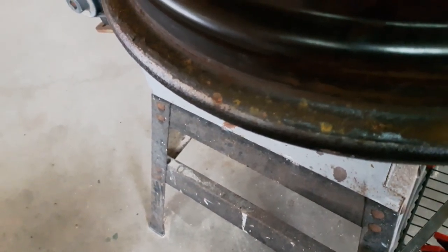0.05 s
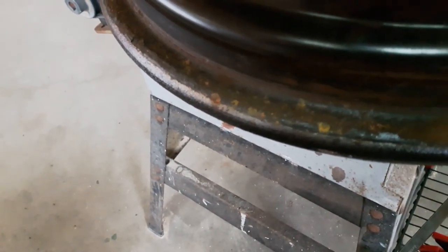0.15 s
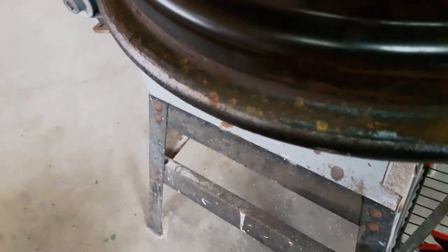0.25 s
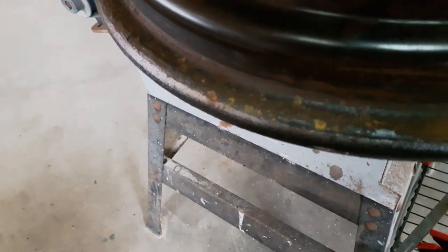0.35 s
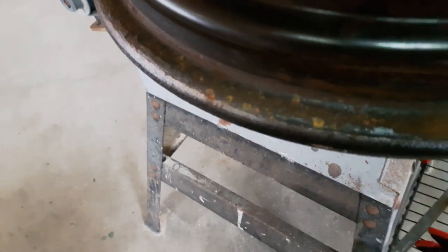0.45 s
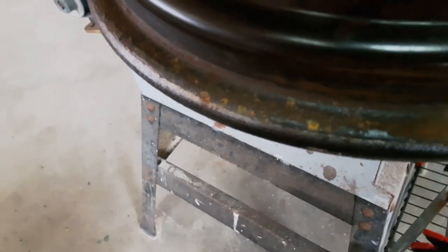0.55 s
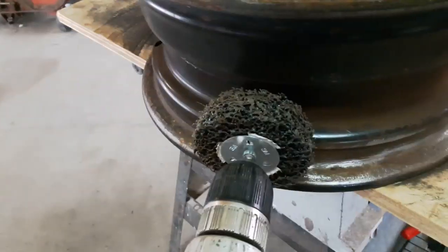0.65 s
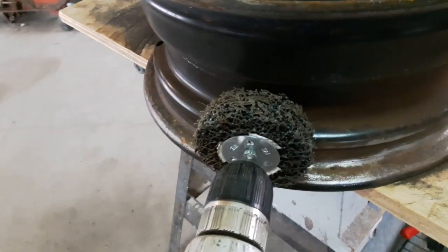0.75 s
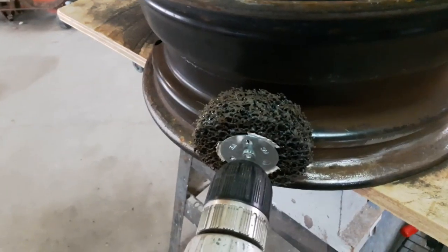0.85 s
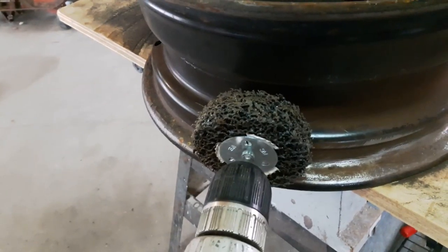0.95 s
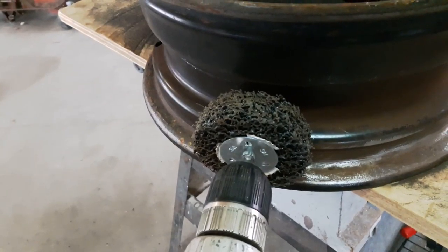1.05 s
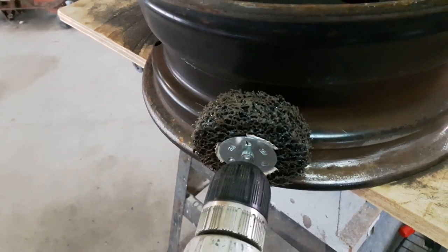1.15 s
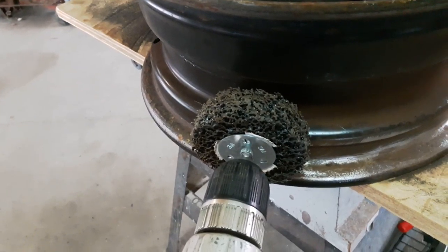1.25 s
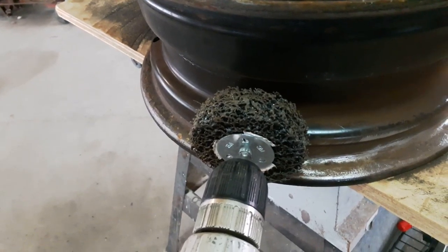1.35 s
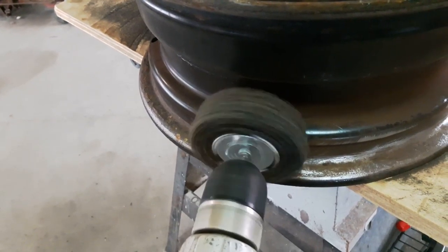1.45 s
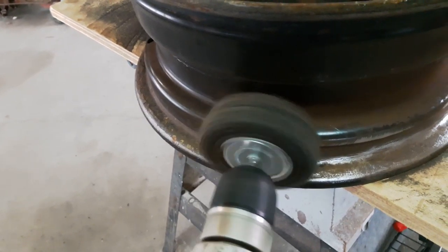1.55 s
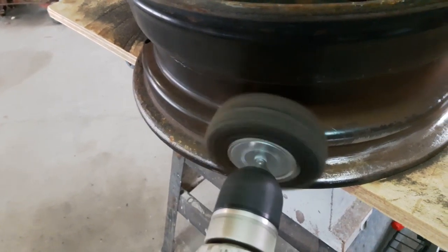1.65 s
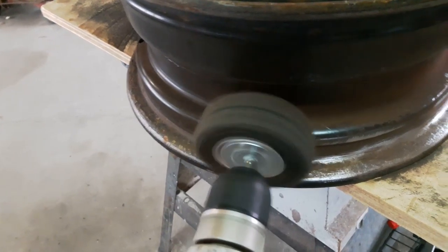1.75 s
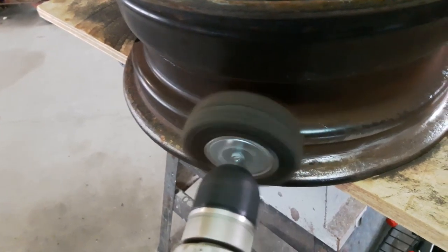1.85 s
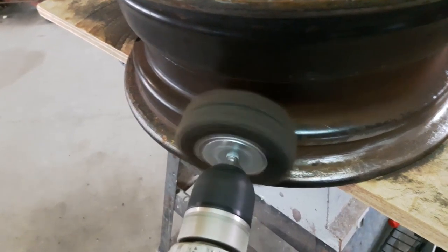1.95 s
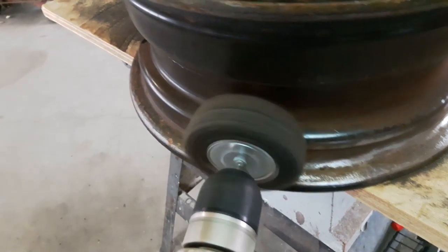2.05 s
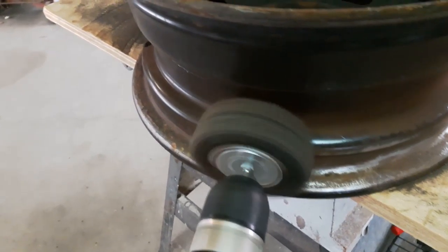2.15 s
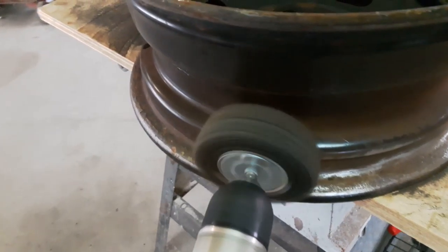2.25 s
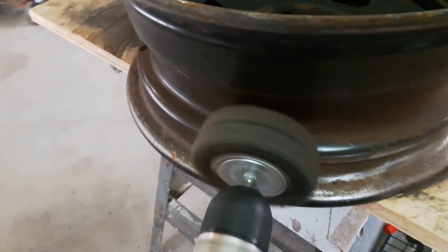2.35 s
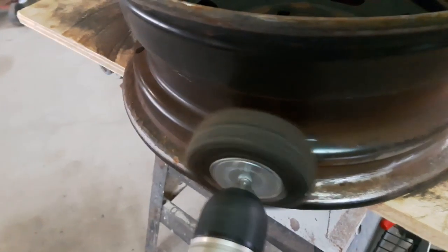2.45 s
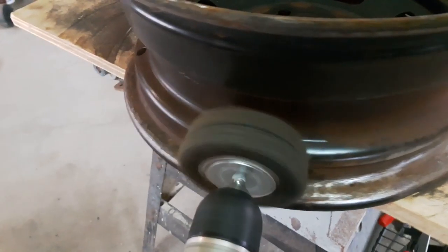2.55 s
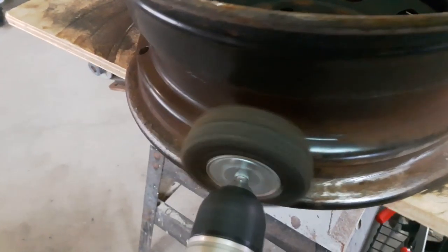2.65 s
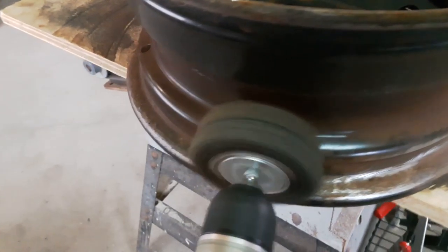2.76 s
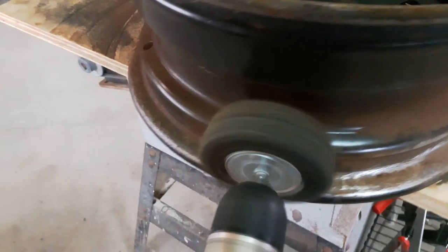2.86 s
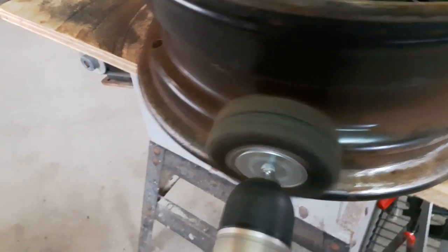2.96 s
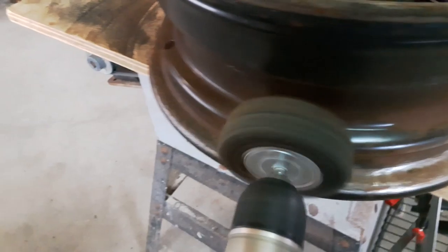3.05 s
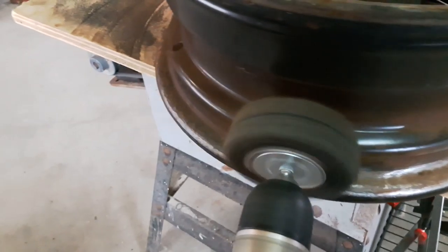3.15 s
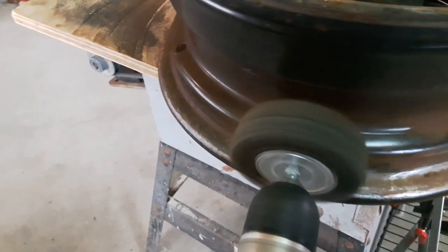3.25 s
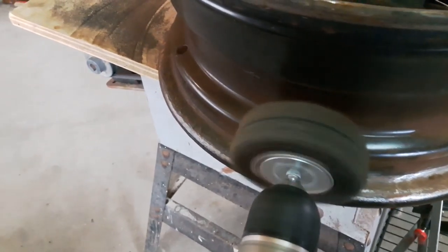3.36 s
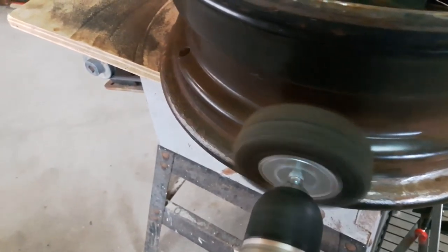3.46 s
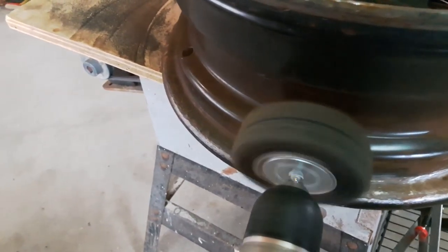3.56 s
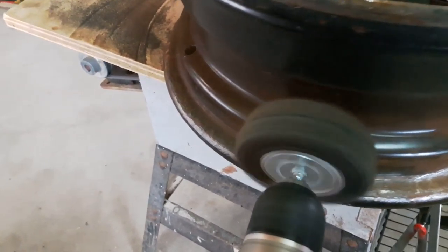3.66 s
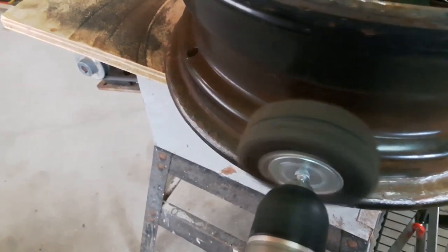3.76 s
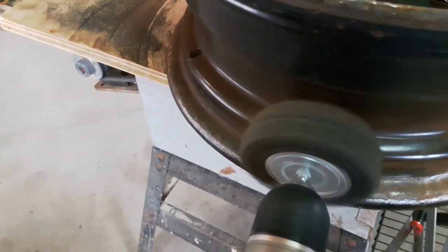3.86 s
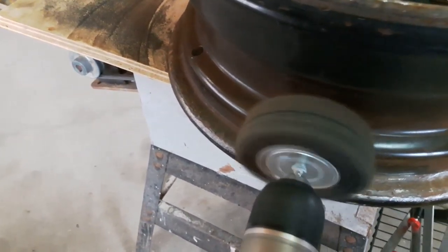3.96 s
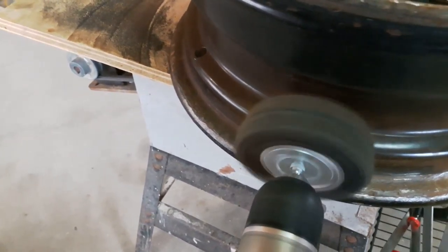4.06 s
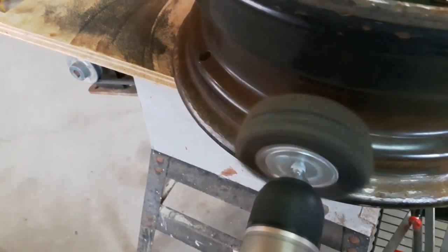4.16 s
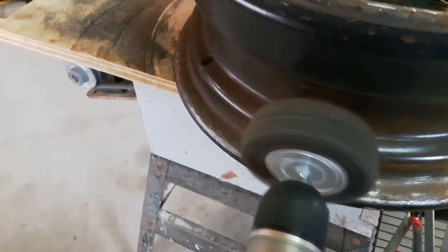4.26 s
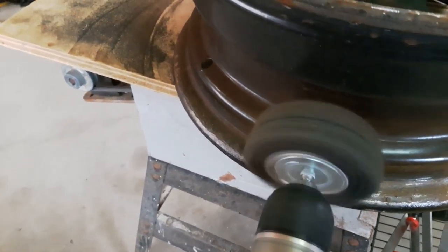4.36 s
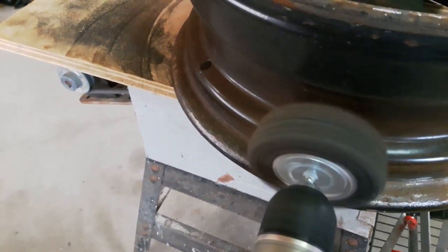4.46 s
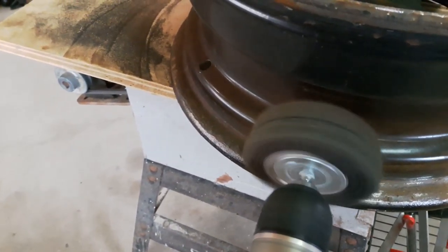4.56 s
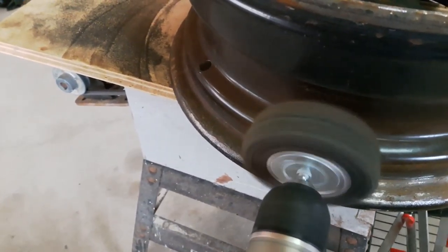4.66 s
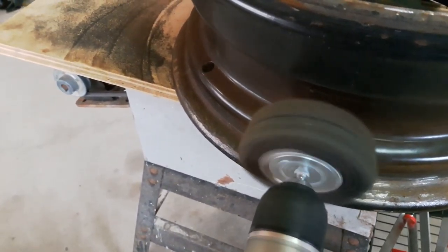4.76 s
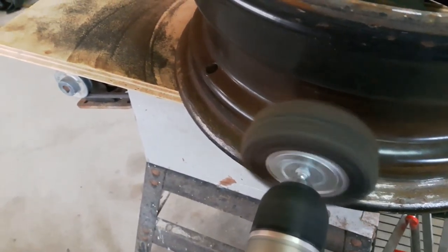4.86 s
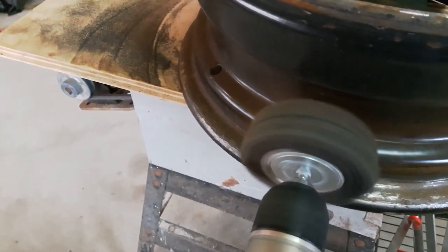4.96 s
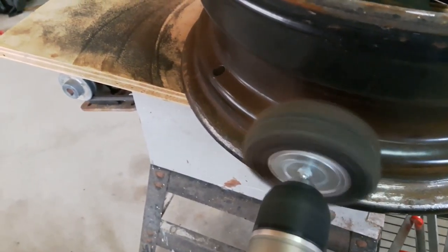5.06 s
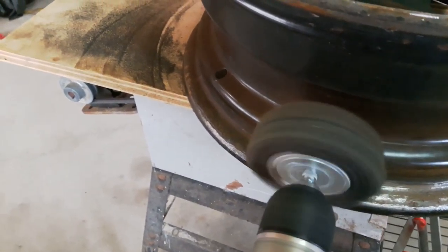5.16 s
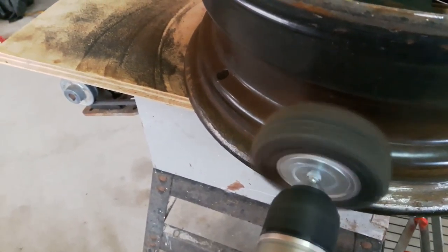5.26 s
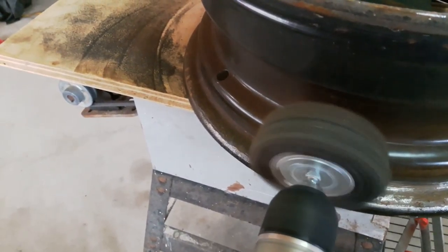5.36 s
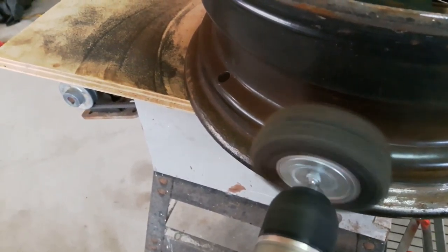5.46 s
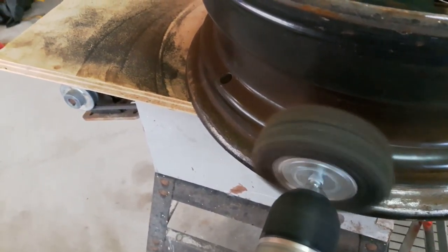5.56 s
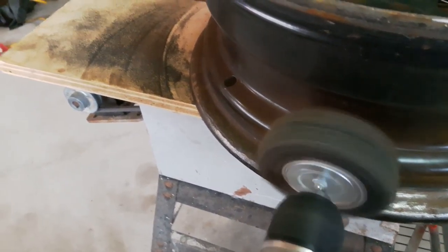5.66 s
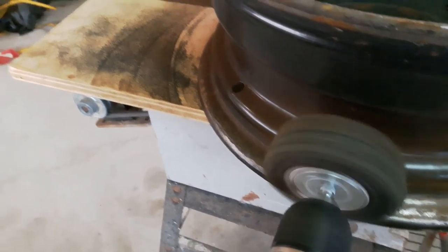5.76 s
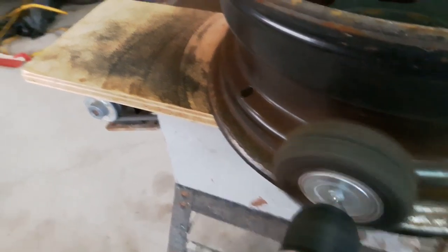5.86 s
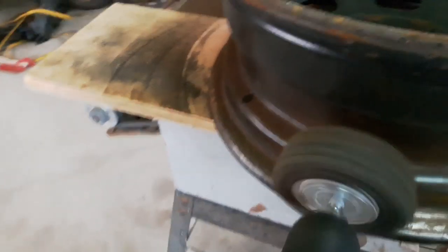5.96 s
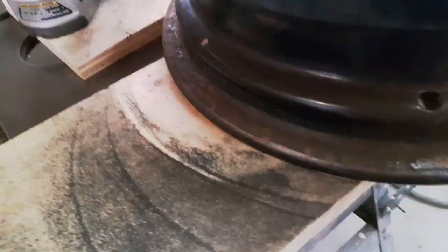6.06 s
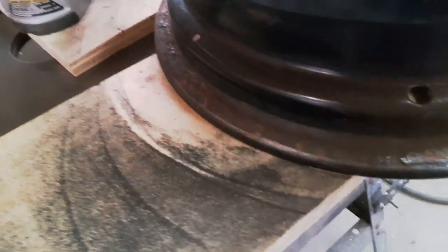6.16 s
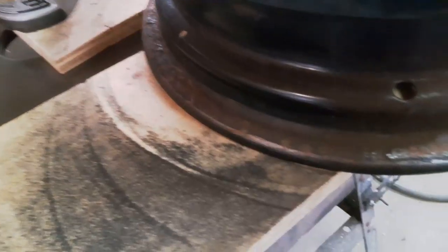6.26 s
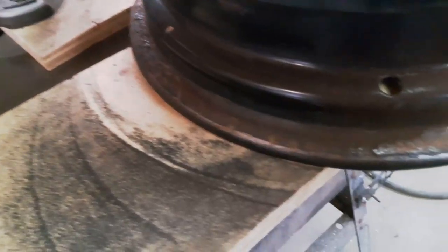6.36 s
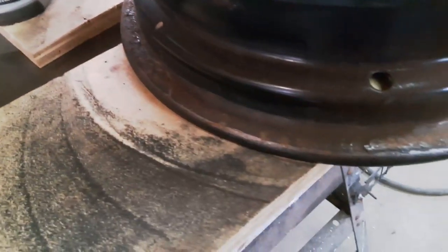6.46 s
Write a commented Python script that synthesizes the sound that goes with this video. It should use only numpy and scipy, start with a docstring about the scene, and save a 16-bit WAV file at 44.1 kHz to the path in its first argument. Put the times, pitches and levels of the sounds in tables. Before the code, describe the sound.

Quiet workshop hum and small knocks, then a cordless drill spins up, its abrasive wheel scrubbing a steel rim harshly until an abrupt cut to quiet.

```python
"""Brush wheel on a rusty rim, quiet workshop

Mains hum, a faint regular tick, air and low rumble lie under everything. Fingers knock the camera body
(struck resonances) and tick the trigger (noise bursts), then a cordless drill spins up and presses an abrasive
brush wheel on a steel rim. Motor and gears whine as tones locked to rotation, the out-of-round wheel throbs
once a turn, and grit noise scrubs and rings the rim. A hard cut leads from the running drill to the quiet room."""
import sys
import numpy as np
from scipy import signal
from scipy.fft import rfft, irfft, next_fast_len
from scipy.io import wavfile
from scipy.ndimage import uniform_filter1d, map_coordinates

SR = 44100
rng = np.random.default_rng(int(sys.argv[2]) if len(sys.argv) > 2 else 0)


def store_wav(level_fs):
    """Save 16-bit WAV to argv[1]."""
    pcm = np.round(np.clip(np.atleast_2d(level_fs), -1, 1) * 32767)
    wavfile.write(sys.argv[1], SR, pcm.T.astype(np.int16))


N = 287135
TIME = np.arange(N) / SR  # s
START_S, FULL_S, CUT_S = 1.5248, 1.76, 6.1003  # first kick, trigger fully in, hard cut to the quiet room
GEARING = 135 / 8  # motor turns for one turn of the wheel
RATED_HZ = 252  # motor turns a second at which the layer levels are stated


def amp(db):
    """dB to gain."""
    return 10 ** (np.asarray(db) / 20)


def unit(x):
    """Scaled to rms 1."""
    return x / np.sqrt(np.mean(x ** 2) + 1e-20)


def curves(rows):
    """One value per sample for each column after the time."""
    s, *cols = np.transpose(rows)
    return [np.interp(TIME, s, c) for c in cols]


def since(start_s):
    """Seconds passed since a moment, zero before it."""
    return np.maximum(TIME - start_s, 0)


def random_phase():
    """A random starting angle in radians."""
    return rng.uniform(0, 2 * np.pi)


def wobble(rate):
    """A smooth random curve, rate knots a second."""
    coarse = TIME[::48]
    knots = rng.standard_normal(int(N * rate / SR) + 4)
    return np.interp(TIME, coarse, map_coordinates(knots, [coarse * rate]))


def filtered(x, response):
    """x times a complex response of frequency."""
    m = next_fast_len(N + SR // 2)
    return irfft(rfft(x, m) * response(np.fft.rfftfreq(m, 1 / SR)), m)[..., :N]


def coloured(x, points):
    """x shaped by (frequency [Hz], gain [dB]) points on a log axis, rms 1."""
    f, db = np.transpose(points)
    return unit(filtered(x, lambda hz: amp(np.interp(np.log(hz + 1), np.log(f + 1), db))))


def mode(hz, width):
    """The causal response of one resonance."""
    return lambda f: 1j * f * width / (hz * hz - f * f + 1j * f * width)


def patchy(patchy_db):
    """White noise with patches of random gain in time and frequency."""
    z = signal.stft(rng.standard_normal(N), nperseg=512)[2]
    across_frequency = uniform_filter1d(rng.standard_normal(z.shape), size=6, axis=0)
    field = uniform_filter1d(across_frequency, size=8, axis=1)
    return signal.istft(z * amp(patchy_db * unit(field)), nperseg=512)[1][:N]


def grains(rate, spread_db):
    """Random clicks, rate a second on average, a few much larger than the rest."""
    hits = rng.random(N) < rate / SR
    return unit(hits * rng.standard_normal(N) * amp(spread_db * rng.exponential(size=N)))


# spectra of the room's low rumble and of its air: (frequency [Hz], relative level [dB])
RUMBLE_SPECTRUM = [(25, -37.5), (45, -22), (62, -4.5), (105, -2.5), (130, -7), (215, -4.5), (330, -12.5),
                   (600, -17), (900, -28.5), (1500, -62.5)]
AIR_SPECTRUM = [(350, -33), (600, -3), (1190, -4), (1400, -8.5), (2200, -14.5), (3300, -18.5), (4200, -16),
                (4700, -23.5), (5400, -29), (9000, -29.5), (16000, -31.5)]
# mains hum partials: (frequency [Hz], relative level [dB])
HUM_PARTIALS = [(60, -72), (120, -81), (240, -78), (300, -60.5), (360, -70), (420, -72), (480, -75)]
# course of the whole hum: (time [s], gain [dB])
HUM_COURSE = [(0, -5), (.5, -6), (.56, -0.5), (6.1, 1), (6.11, -2), (6.51, -1)]
# low tones that swell and fade: (start [s], end [s], frequency [Hz], peak level [dB])
DISTANT_TONES = [(6.2, 6.27, 200, -51), (6.24, 6.33, 285, -55), (6.31, 6.35, 215, -55),
                 (6.37, 6.42, 225, -51), (6.36, 6.5, 280, -52)]
RUMBLE_DB, AIR_DB, AFTER_DB = -58, -69.5, 1.5  # base levels; rise of rumble and air after the cut


def workshop():
    """Room tone: shaped noise for rumble and air, mains partials, and brief low tones from far away."""
    after_db = AFTER_DB * (TIME > CUT_S)
    rumble_db = RUMBLE_DB + after_db + 0.8 * wobble(2.5) + 0.5 * wobble(13)
    rumble = amp(rumble_db) * coloured(patchy(patchy_db=1.3), RUMBLE_SPECTRUM)
    air_db = AIR_DB + after_db + 0.83 * wobble(2.5)
    air_noise = patchy(patchy_db=1.6) + 0.3 * grains(300, spread_db=2)
    air = amp(air_db) * coloured(air_noise, AIR_SPECTRUM)
    hum = np.zeros(N)
    for hz, db in HUM_PARTIALS:
        hum += amp(db + 1.5 + 1.2 * wobble(12)) * np.sin(2 * np.pi * hz * TIME + random_phase())
    tones = np.zeros(N)
    for start, end, hz, db in DISTANT_TONES:
        swell = np.sin(np.pi * np.clip((TIME - start) / (end - start), 0, 1))
        tones += amp(db) * swell * np.sin(2 * np.pi * hz * TIME)
    return rumble + air + amp(curves(HUM_COURSE)[0]) * hum + tones


# three stretches joined by hard cuts, each with its own tick timing: (stretch start [s], reference tick [s])
TICK_STRETCHES = [(0, .0905), (.52, .5714), (6.1, 6.127)]
PULSE_DB, TICK_EVERY_S = -58, 0.1024  # noise level before filtering; interval


def pulse():
    """A faint tick about ten times a second: decaying noise, narrow in pitch, with a trace of treble."""
    starts, references = np.transpose(TICK_STRETCHES)
    stretch = np.searchsorted(starts, TIME, side="right") - 1
    since_tick = (TIME - references[stretch]) % TICK_EVERY_S
    decay_db = 60 * since_tick / 0.016
    burst = amp(PULSE_DB + 1.5 * wobble(10) - decay_db) * rng.standard_normal(N)
    return filtered(burst, lambda f: 0.06 * (f > 5000) + mode(4400, 900)(f) ** 2)


# finger blows on the camera body: (time [s], level [dB], sharp part [dB])
BLOWS = [(0.52, -27, 3.5), (.535, -44, -2), (.5452, -38, -20), (0.5474, -24, -15)]
# resonances of the camera body: (frequency [Hz], width [Hz], level [dB])
BODY_MODES = [(126, 49, 6.5), (510, 190, 5.5), (1000, 340, -1), (2080, 870, -3), (4140, 250, -2)]


def knocks():
    """Fingers knock the camera body: a sharp edge and a soft, rounded push ring its resonances."""
    blows, t = np.zeros(N), np.arange(SR // 100) / SR
    for s, db, sharp_db in BLOWS:
        push = t / 0.0006 * np.exp(1 - t / 0.00042)
        edge = amp(sharp_db) * np.exp(-t / 0.0003)
        blows[round(s * SR):][:len(t)] -= amp(db) * (0.34 * push + edge)
    ringing = np.zeros(N)
    for k, (hz, width, db) in enumerate(BODY_MODES):
        ringing += (-1) ** k * amp(db) * filtered(blows, mode(hz, width))  # neighbours in opposite sign
    return ringing


# trigger ticks: (time [s], burst level before the housing [dB])
TRIGGER_TICKS = [(.84, -69), (1.3613, -50.5), (1.3654, -56), (1.4294, -70), (1.5255, -50), (1.5434, -42)]


def housing(f):
    """The plastic housing: some direct sound and three broad resonances."""
    low, middle, high = mode(900, 900)(f), mode(4200, 650)(f), mode(14500, 4000)(f)
    return 0.1 + 3 * middle ** 2 + 6 * low ** 2 + 0.25 * high ** 2


def trigger():
    """Small plastic ticks as the finger loads the switch: noise bursts ringing briefly in the housing."""
    bursts, t = np.zeros(N), np.arange(SR // 50) / SR
    for s, db in TRIGGER_TICKS:
        bursts[round(s * SR):][:len(t)] += amp(db - 60 * t / 0.016) * rng.standard_normal(len(t))
    return filtered(bursts, housing)


# motor speed at full trigger: (time [s], turns a second [Hz])
FULL_SPEED = [(1.95, 258.1), (2.2, 255.3), (2.95, 251.4), (4.0, 251.8), (4.4, 253.0), (4.95, 251.0),
              (6.1, 251.9)]
HALF_HZ, KICK_HZ, SPIN_UP_S = 190.6, 40.3, 0.07  # trigger half in: speed approached, first kick, time constant
JUMP_S = 0.034  # time to reach full speed once the trigger is fully in
HIGH_SPOT_S = 1.95  # a moment when the high spot of the wheel meets the rim


def rotation():
    """Smooth speed [Hz], speed with the load tugging at it [Hz], and motor angle [rad]."""
    half = HALF_HZ - (HALF_HZ - KICK_HZ) * np.exp(-since(START_S) / SPIN_UP_S)
    steady = half + (curves(FULL_SPEED)[0] - half) * np.clip((TIME - FULL_S) / JUMP_S, 0, 1)
    speed = steady * (1 + 0.00199 * wobble(25))
    motor = 2 * np.pi * np.cumsum(speed) / SR
    return steady, speed, motor - np.interp(HIGH_SPOT_S, TIME, motor)


# (level at rated speed and full pressure [dB], power of speed,
#  loss at light pressure [dB], bounce once a turn at light pressure [dB])
SCRUBBING, RASPING = (-25.5, 1.54, 4.5, 0.9), (-27.5, 2, 6.5, 1.5)
HISSING, HUMMING = (-19.5, 2.5, 1.5, 0), (-33.5, 3, -1, 0.3)


def layer_db(layer, steady, light, wheel):
    """Base level of a layer [dB]: grows with speed, and follows pressure and the wheel's bounce."""
    db, power, light_db, bounce_db = layer
    speed_db = 20 * np.log10(steady / RATED_HZ)
    return db + power * speed_db + light * (bounce_db * np.cos(wheel) - light_db)


LOOSE = 0.95  # extra share of phase wander at light pressure


def lines(motor, light, table, flutter_db, rate):
    """Tones at multiples of the motor angle, unsteady in level and phase, pulsing once a wheel turn."""
    high_spot = np.cos(motor / GEARING)
    tones = np.zeros(N)
    for k, db, wander, depth, light_db in table:
        gain = (1 + depth * high_spot) * amp(db - light_db * light + flutter_db * wobble(rate))
        tones += gain * np.sin(k * motor + wander * (1 + LOOSE * light) * wobble(60))
    return tones


# motor shaft tones, the 8/3 row the gear mesh tone: (multiple of motor turns, relative level [dB], phase wander
# [rad], depth of pulsing once a wheel turn, loss at light pressure [dB])
SHAFT_LINES = [(1, -0.37, 0.05, -0.017, -1.5), (2, -6, 0.43, 0, 0.5), (64 / 27, -11, .2, 0, 3),
               (8 / 3, -5.5, 0.19, 0, 3), (5, -4, 0.6, 0.1, 1.5)]
# shaking that repeats each wheel turn: (multiple of wheel turns, relative level [dB])
WHEEL_SHAKE = [(1, -44.5), (2, -46.5), (3, -29), (4, -36), (5, -28.5), (6, -22.5), (7, -14.5), (8, -17.5),
               (9, -20.5), (10, -15.5), (11, -16.5), (12, -10), (13, -17.5), (14, -16.5), (15, -14.5),
               (16, -12.5), (17, -18.5), (18, -4), (19, -14.5), (20, -9.5), (21, -15.5), (22, -23.5),
               (23, -16.5)]
# the motor hum dips briefly: (time [s], depth [dB])
HUM_DIPS = [(2.31, 4), (3.0, 2.5), (5.7, 6)]
DIP_S, SHAKE_LIGHT_DB = 0.058, 3.5  # dip time to 1/e; shake lost at light pressure


def motor_hum(drill_db, speed, motor, light):
    """Shaft tones with the gear mesh tone, and a wheel imbalance whose shaking grows with speed squared."""
    wheel = motor / GEARING
    for s, db in HUM_DIPS:
        drill_db = drill_db - db * np.exp(-((TIME - s) / DIP_S) ** 2)
    shake = np.zeros(N)
    for k, db in WHEEL_SHAKE:
        gain = amp(db - SHAKE_LIGHT_DB * light + 1.1 * wobble(3.01))
        shake += gain * np.sin(k * wheel + random_phase())
    shaft = lines(motor, light, SHAFT_LINES, flutter_db=1.4, rate=8)
    return amp(drill_db) * (shaft + 0.91 * (speed / RATED_HZ) ** 2 * shake)


# gear mesh tones: (multiple of motor turns, relative level [dB], phase wander [rad],
#  depth of pulsing once a wheel turn, loss at light pressure [dB])
GEAR_LINES = [(14 / 3, -10, 0.59, .3, -5.5), (7, -16.5, 0, 0.5, -1), (7.5, -4.5, 1.1, 1.05, 8),
              (9, -11, .5, 0.44, 5), (28 / 3, -3, 0.58, .08, 0), (56 / 3, -12, .9, .1, 0)]
# course of the gear whine: (time [s], gain [dB])
WHINE_COURSE = [(1.525, -44.5), (1.6, -34), (1.71, -42), (1.745, -33), (1.79, -40), (2.1, -38),
                (2.65, -30.5), (6.1, -30.5)]


def gear_whine(motor, light):
    """Gear mesh tones locked to the motor's rotation."""
    return amp(curves(WHINE_COURSE)[0]) * lines(motor, light, GEAR_LINES, flutter_db=1.3, rate=30)


# uneven brush pressure: (times a wheel turn, depth [0-1])
PRESSURE_THROB = [(1, 0.06), (2, 0.07), (5, 0.1), (9, 0.15)]


def brush_throb(wheel):
    """Brush pressure rising and falling through each turn of the out-of-round wheel."""
    throb = np.ones(N)
    for k, depth in PRESSURE_THROB:
        angle = random_phase() if k > 1 else 0  # the once-a-turn part peaks at the high spot
        throb += depth * np.cos(k * wheel + angle)
    return throb


# spectrum of the scrubbing: (frequency [Hz], relative level [dB])
SCRUB_SPECTRUM = [(35, -55), (55, -29), (100, -14.5), (260, -8), (400, -5.5), (900, -5), (1250, -2),
                  (1600, -6.5), (2100, -7), (3150, -7.5), (3500, -10.5), (4500, -30)]


def scrub(scrub_db, chatter):
    """Broad scrubbing of the brush: patchy noise and grit clicks under the chattering pressure."""
    grit = patchy(patchy_db=0.58) + 0.3 * grains(2000, spread_db=1.5)
    return amp(scrub_db - 1.0) * coloured(chatter * grit, SCRUB_SPECTRUM)


# spectrum of the rasp: (frequency [Hz], relative level [dB])
RASP_SPECTRUM = [(3300, -43), (3620, -19.5), (3770, 1.5), (4050, -1.5), (4550, -2.5), (5050, -9),
                 (5450, -20.5), (6500, -38.5)]
JOLT_DB, JOLT_S = 6, 0.025  # flare as the trigger goes fully in; its time constant


def rasp(rasp_db, chatter):
    """A narrower, brighter band of grit noise that flares as the trigger goes fully in."""
    jolt_db = JOLT_DB * (TIME > FULL_S) * np.exp(-np.abs(TIME - FULL_S) / JOLT_S)
    grit = patchy(patchy_db=0.5) + 0.37 * grains(2000, spread_db=1.5)
    return amp(rasp_db + jolt_db) * coloured(chatter ** 0.78 * grit, RASP_SPECTRUM)


# spectrum of the fine grit: (frequency [Hz], relative level [dB])
GRIT_SPECTRUM = [(4500, -41.5), (5500, -16), (7340, -10), (8360, -10.5), (11000, -4), (13700, 1.5),
                 (15200, 1.5), (16000, -2.5)]


def grit_hiss(hiss_db, throb):
    """Fine grit: treble noise with dense clicks, following the throb softly."""
    grit = patchy(patchy_db=0.73) + 0.42 * grains(6000, spread_db=1.5)
    pressure = throb ** 0.52 * amp(0.37 * wobble(40))
    return amp(hiss_db + 1.33) * coloured(pressure * grit, GRIT_SPECTRUM)


# rim modes, the 4070 Hz row a resonance of the drill housing: (frequency [Hz], width [Hz], relative level [dB],
# time of best drive [s], reach [s])
RIM_MODES = [(1276, 150, -8, 2.8, 4), (2541, 120, -20.5, 6.7, 2.1), (4003, 65, -16, 3.4, 3),
             (4070, 260, -8, 1.55, .15), (10720, 80, -15, 3, 3), (11620, 180, -8, 3.1, 3.5),
             (12930, 30, -11, 4, 3), (13255, 15, -7, 6.6, 0.86), (13455, 20, -4, 2.3, 1.1),
             (13900, 25, -6.5, 4.2, .9), (14870, 50, -11, 5, 2)]


def rim_ring(scrub_db, hiss_db, chatter):
    """The brush creeps along the rim, so noise drives each rim mode best at its own moment; one housing
    resonance rings near 4 kHz early on."""
    drive = chatter * rng.standard_normal(N)
    ring = np.zeros(N)
    for hz, width, db, best, reach in RIM_MODES:
        follow_db = scrub_db if hz < 6000 else hiss_db - 6  # high modes follow the fine grit
        away_db = 3.6 * ((TIME - best) / reach) ** 2
        ring += amp(follow_db + db - away_db) * unit(filtered(drive, mode(hz, width)))
    return ring


LEAN_S = 0.48  # time constant of the pressure building up after full trigger
BITE_S = 0.02  # time constant of the bright layers building up after the first kick
TAIL_DB, TAIL_S = -25, 0.004  # faint remainder after the cut and its time constant


def drill():
    """Motor and gears turn the wheel while speed and pressure set how hard grit scrubs the rim."""
    steady, speed, motor = rotation()
    wheel = motor / GEARING
    light = np.exp(-since(FULL_S) / LEAN_S)  # 1 = barely touching, 0 = full pressure
    layers = (SCRUBBING, RASPING, HISSING, HUMMING)
    scrub_db, rasp_db, hiss_db, drill_db = [layer_db(layer, steady, light, wheel) for layer in layers]
    throb = brush_throb(wheel)
    chatter = throb * amp(0.42 * wobble(30) + 0.69 * wobble(120))
    machine = motor_hum(drill_db, speed, motor, light) + gear_whine(motor, light)
    bite = (1 - np.exp(-since(START_S) / BITE_S)) ** 3
    bright = bite * (rasp(rasp_db, chatter) + grit_hiss(hiss_db, throb))
    sound = machine + scrub(scrub_db, chatter) + bright + rim_ring(scrub_db, hiss_db, chatter)
    onset = np.clip((TIME - START_S) / 0.0015, 0, 1)
    before_cut = np.clip((CUT_S - TIME) / 0.0004, 0, 1)
    tail = amp(TAIL_DB) * np.exp(-np.abs(TIME - CUT_S) / TAIL_S)
    return sound * onset * np.maximum(before_cut, tail)


def scene():
    """One microphone feeds both channels."""
    mono = workshop() + pulse() + knocks() + trigger() + drill()
    return np.array([mono, mono])


TOP_HZ = 15750  # middle of the 120 Hz wide fade at the band limit


def record(dry):
    """The loudest peaks are squeezed a little; nothing is kept above the band limit."""
    squeezed = dry / (1 + np.abs(dry / 0.75) ** 4) ** 0.25
    return filtered(squeezed, lambda hz: np.cos(np.pi / 2 * np.clip((hz - TOP_HZ) / 120 + 0.5, 0, 1)) ** 2)


dry = scene()
out = record(dry)
store_wav(out)
```